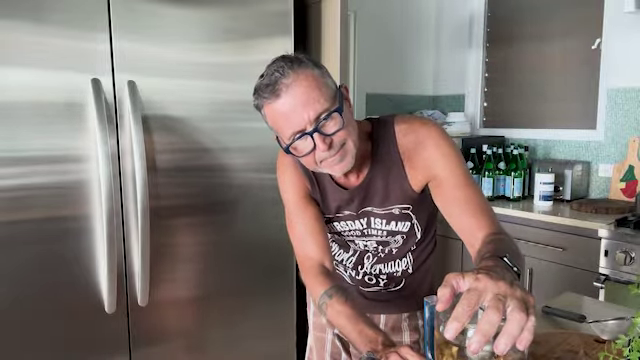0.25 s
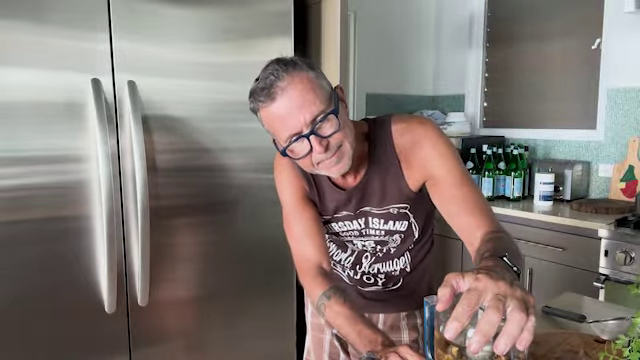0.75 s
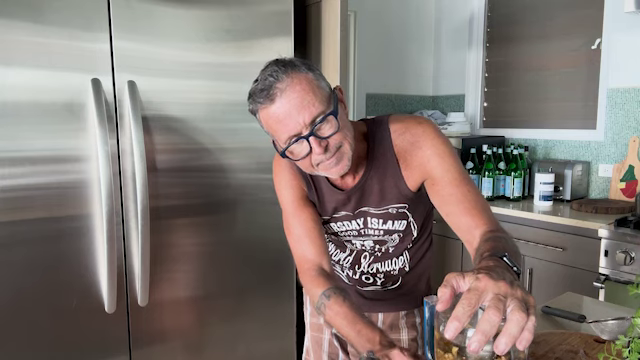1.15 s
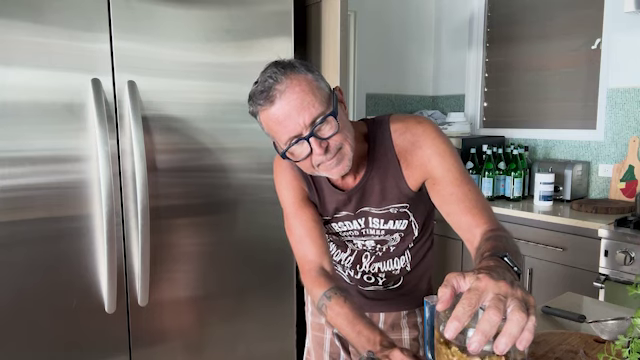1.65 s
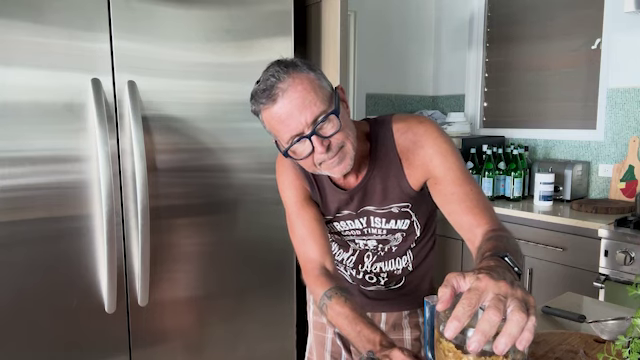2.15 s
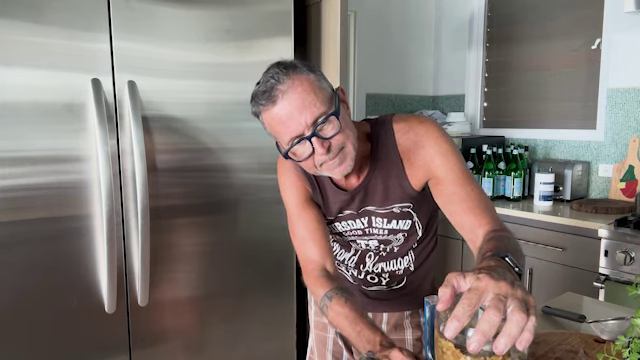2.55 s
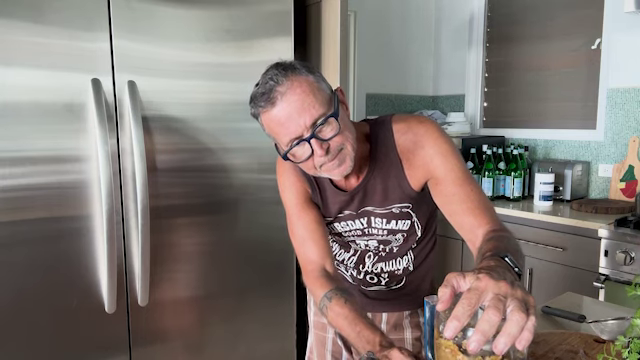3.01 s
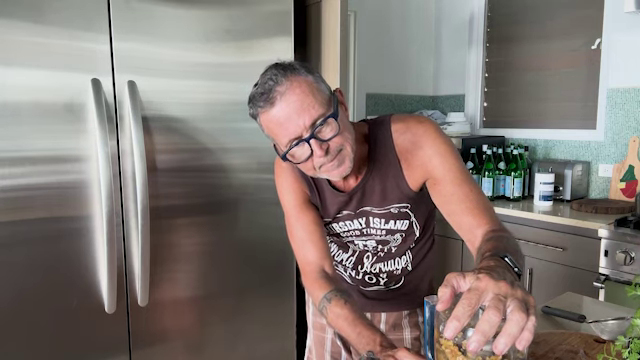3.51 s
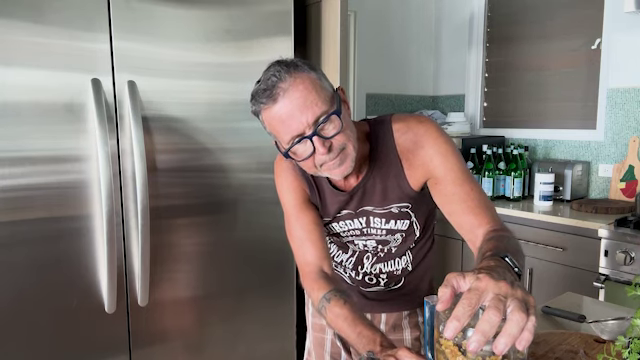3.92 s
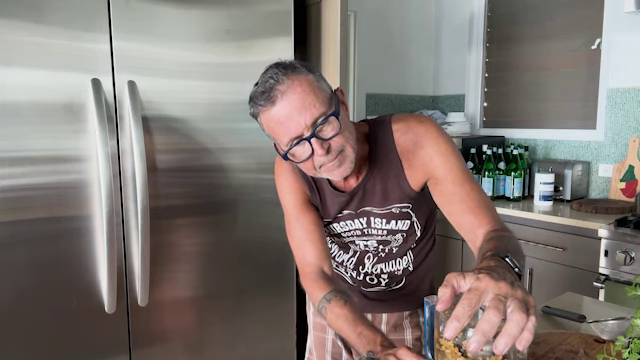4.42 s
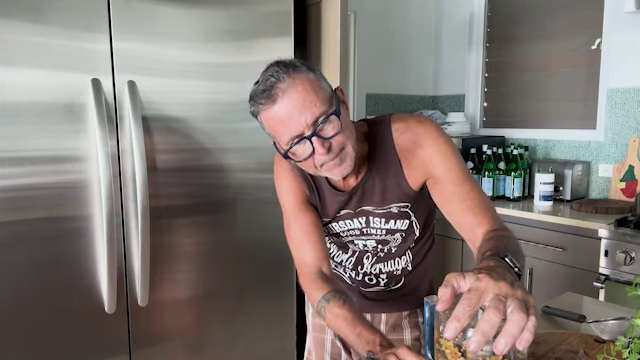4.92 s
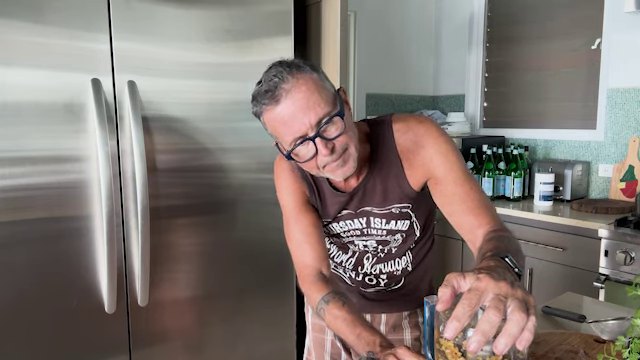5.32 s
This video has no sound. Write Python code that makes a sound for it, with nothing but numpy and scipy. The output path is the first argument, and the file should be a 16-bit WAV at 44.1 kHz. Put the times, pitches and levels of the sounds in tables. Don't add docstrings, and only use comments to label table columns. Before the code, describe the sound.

Quick jabs of an electric chopper's motor rise and sag with grinding and rattling, clicking switch and a faint fridge hum in an echoing kitchen.

```python
import sys
import numpy as np
from scipy import signal
from scipy.fft import rfft, irfft
from scipy.io import wavfile

SR = 44100
rng = np.random.default_rng(int(sys.argv[2]) if len(sys.argv) > 2 else 0)


def ratio_of_db(decibels):
    return 10 ** (np.asarray(decibels, float) / 20)


def unload_wav(signal):
    wavfile.write(
        sys.argv[1],
        SR,
        np.round(np.clip(np.atleast_2d(signal).T, -1, 1) * 32767).astype(np.int16),
    )


N = 245276
M = 2 ** 18
T = np.arange(N) / SR
FREQ = np.fft.rfftfreq(M, 1 / SR) + 1e-3

# start in seconds, time held in seconds, drag of the food as tooth rate
# in Hz, level in dB, bowl rattle in dB.
PRESSES = [(0.0, .06, 1099, -27.5, 1), (0.12, .18, 1400, -28, 2), (0.361, 0.17, 2200, -29, 3),
           (0.635, 0.11, 2300, -28, 3), (1.161, .22, 2500, -27.5, 1), (1.677, 0.12, 2300, -27, 2),
           (2.035, .122, 2202, -27, 2.5), (2.245, 0.089, 2399, -28.5, 2), (2.472, .09, 2597, -27, 1),
           (2.725, .07, 1898, -27.5, 3), (2.95, .075, 2203, -27, 2), (4.031, 0.14, 2000, -29, 2.5),
           (4.675, 0.13, 1966, -28, 2.5)]
START_HZ, FULL_HZ, REST_HZ, KICK_HZ = 1812.4, 2470, 99.6, 548.4
SPIN_UP_S, COAST_S = 0.054, 0.42
CONTACT_S, JERK_S = 0.006, 0.005


def motor():
    hz, driven = np.full(N, float(START_HZ)), np.zeros(N)
    now = START_HZ
    ends = [row[0] for row in PRESSES[1:]] + [N / SR]
    for (start, held, drag_hz, _, _), end in zip(PRESSES, ends):
        release = start + held

        def climb(t):
            return FULL_HZ + (max(now, KICK_HZ) - FULL_HZ) * np.exp(-(t - start) / SPIN_UP_S)

        def coast(t):
            falling = (climb(release) + drag_hz) * np.exp(-(t - release) / COAST_S)
            return np.maximum(falling - drag_hz, 0)

        later = T >= start
        t = T[later]
        hz[later] = np.where(t < release, climb(t), coast(t))
        driven[later] = t < release
        now = coast(end)
    return lag(hz, CONTACT_S), lag(driven, JERK_S)


# multiple of the tooth rate, level in dB.
TEETH = [(3, -10.5), (4, -16.5)]
# frequency in Hz, width in Hz, level in dB.
HOUSING = [(1070, 490, 5.5), (1518, 226, 9.5), (2056, 350, 0), (2860, 1100, -4), (3540, 570, 7),
           (4570, 170, 0.5), (5430, 660, 3.5)]
# frequency in Hz, width in Hz, level in dB.
BOWL = [(9400, 1300, -10.5), (9470, 380, -5), (10860, 3300, -10.5)]
HOUSING_DB = -9
FIRST_DB, SECOND_DB, MESH_HZ = (-2, 0.5), (-5.5, 2), (714, 790)
SECOND_HZ, SECOND_WIDTH_HZ = 1950, 380


def gears(hz, driven):
    mesh_db = -18 * np.exp(-(hz / between(MESH_HZ, driven)) ** 4)
    sings_db = 7 * np.exp(-((hz - SECOND_HZ) / SECOND_WIDTH_HZ) ** 2) - 5
    first_db = between(FIRST_DB, driven) + mesh_db
    second_db = between(SECOND_DB, driven) + mesh_db + sings_db
    hz = np.maximum(hz, REST_HZ)
    backlash = 0.64 + 0.5 * (hz / 2000) ** 1.5
    turn = 2 * np.pi * np.cumsum(hz * (1 + 0.011 * walk(120))) / SR
    tone = 0
    for multiple, db in [(1, first_db), (2, second_db)] + TEETH:
        phase = multiple * turn + backlash / np.sqrt(multiple) * walk(450)
        tone = tone + ratio_of_db(db + 5.05 * walk(110)) * np.cos(phase)
    shaft = (-turn / (2 * np.pi * 19) + 0.25 * walk(60)) % 1
    knock = 3.8 + shaft ** 3 * ratio_of_db(5.7 * walk(100))
    housing = level(tone + ratio_of_db(HOUSING_DB) * ring(tone, HOUSING), -2.5)
    bowl = level(ring(tone, BOWL), -14.5)
    return housing + bowl, knock


# frequency in Hz, density in dB per Hz.
WHIRR = [(120, -43.5), (200, -8.5), (365, -3.5), (479, 0.5), (607, -5.5), (1510, -7.5), (3070, 1),
         (3680, -4), (6960, -4.5), (9480, -7), (13900, -24.5), (14700, -4.5)]


def whirr(knock):
    chips = noise() * ratio_of_db(2.0 * walk(400)) * knock ** 0.39
    return level(colour(chips + ratio_of_db(-3.5) * ring(chips, HOUSING), WHIRR), 0.95)


def rattle(knock):
    return level(ring(noise() * knock * ratio_of_db(1.63 * walk(500)), BOWL), -1.27)


# frequency in Hz, width in Hz, level in dB.
COUNTER = [(147, 20, 4), (195, 50, -8), (310, 60, -10), (484, 14, -6)]
MAINS_HZ = 121.2


def drum():
    boom = level(ring(noise() * ratio_of_db(0.85 * walk(25)), COUNTER), -0.51)
    buzz = ratio_of_db(-15.0) * np.sin(2 * np.pi * MAINS_HZ * T + 0.5 * walk(4.6))
    return colour(boom + buzz, [(60, -4), (115, -0.5)])


BUZZ_HZ, BUZZ_S, BUZZ_DB = 486.2, (0.5, 0.92), -15


def jar():
    touching = 1.0 * (T > BUZZ_S[0]) * (T < BUZZ_S[1])
    return lag(touching, 0.04) * ratio_of_db(BUZZ_DB) * np.sin(2 * np.pi * BUZZ_HZ * T)


# frequency in Hz, level
# in dB.
TREBLE_END = [(14650, 0), (14950, -35)]
LOUDNESS_POWER, WHINE_POWER = 1.58, 0.95
TORQUE_DB = -3
SETTLE_DB, SETTLE_S = -10.5, 0.13
RATTLE_DB, DRUM_DB = (-10, 1.5), (-4.5, -9.5)


def machine():
    hz, driven = motor()
    speed = hz / FULL_HZ
    rows = np.array(PRESSES)
    press = np.maximum(np.searchsorted(rows[:, 0], T, side="right") - 1, 0)
    strength = ratio_of_db(lag(rows[press, 3], 0.025))
    growl = ratio_of_db(TORQUE_DB) * driven * (1 - np.minimum(speed, 1))
    loud = strength * (speed ** LOUDNESS_POWER + growl)
    loud = loud + ratio_of_db(SETTLE_DB) * lag(loud, SETTLE_S)
    rattle_db = between(RATTLE_DB, lag(speed, 0.011)) + lag(rows[press, 4], 0.03)
    drum_db = between(DRUM_DB, speed)
    whine, knock = gears(hz, driven)
    mix = jar() + whirr(knock) + ratio_of_db(rattle_db) * rattle(knock) + ratio_of_db(drum_db) * drum()
    whine = ratio_of_db(-0.5) * strength * speed ** WHINE_POWER * whine
    return colour(ratio_of_db(-2.5) * loud * mix + whine, TREBLE_END)


# start in seconds, peak level in dB, housing knock in dB against
# the crack, knock decay t60 in seconds.
TICKS = [(1.165, -15, -4, 0.05), (1.667, -32, -11, 0.05), (2.042, -23, -16, 0.032),
         (4.036, -18.5, -1.5, 0.052), (4.666, -28.5, -5.5, 0.084), (5.46, -34.5, 4, 0.074),
         (5.492, -36, -6.5, 0.12)]
# frequency in Hz, width in Hz, level in dB.
SWITCH = [(1190, 300, 1.5), (2300, 1100, -6.5), (4180, 1150, -23)]


def ticks():
    crack, knock = np.zeros((2, N))
    t = T[:4096]
    for start, db, knock_db, t60 in TICKS:
        i = int(start * SR)
        grit = rng.standard_normal(len(t))
        crack[i:i + len(t)] += ratio_of_db(db) * (grit * np.exp(-t / 0.0014))[:N - i]
        knock[i:i + len(t)] += ratio_of_db(db + knock_db) * (grit * 1000.0 ** (-t / t60))[:N - i]
    return colour(crack, [(3000, -6.0), (9000, -17.5), (15500, -10)]) + ring(knock, SWITCH)


# frequency in Hz, decay t60 in seconds, level in dB against the direct sound.
ROOM = [(200, 0.99, -8), (742, 0.73, -1), (3500, 0.71, -0.5), (9670, 0.65, -12), (14000, 0.24, -12.5)]


def kitchen(x):
    t = T[:SR]
    band_hz = np.array(ROOM)[:, 0]
    alike = 1 / (1 + (FREQ / 330) ** 4)
    echo = 0
    for k, (_, t60, db) in enumerate(ROOM):
        share = np.interp(np.log(FREQ), np.log(band_hz), np.arange(len(ROOM)) == k)
        tail = rng.standard_normal((2, SR)) * 1000.0 ** (-t / t60) * (t > 0.004)
        tail = tail * ratio_of_db(db) / np.sqrt(np.sum(tail ** 2, axis=1, keepdims=True))
        tail = rfft(tail, M)
        echo = echo + share * (alike * tail[0] + np.sqrt(1 - alike ** 2) * tail)
    return signal.fftconvolve(x[None], irfft(echo, M)[:, :SR], axes=1)[:, :N]


# frequency in Hz, rms level in dB.
FRIDGE = [(59.2, -66), (91.5, -67), (118.4, -60), (317.6, -77), (586.8, -68.5), (640.6, -71)]
# frequency in Hz, density in dB per Hz.
AIR = [(15, -51), (25, -38), (107, -1.5), (525, -15), (584, -16), (703, -20.5), (1470, -29), (2030, -25),
       (8690, -42), (11600, -49), (14000, -68)]
AIR_DB = -58.5


def fridge():
    hum = 0
    for hz, db in FRIDGE:
        line = np.sin(2 * np.pi * hz * T + 0.85 * walk(4.2))
        hum = hum + np.sqrt(2) * ratio_of_db(db + 1.2 * walk(23.0)) * line
    mid = colour(noise(), AIR)
    side = colour(colour(noise(), AIR), [(100, -10.5), (600, 1.0)])
    return hum + level(mid + side * np.array([[1], [-1]]), AIR_DB)


def noise():
    return rng.standard_normal(N)


def walk(rate):
    steps = rng.standard_normal(N // 8)
    return 1.2 * np.interp(T * rate, np.arange(len(steps)), steps)


def lag(x, seconds):
    keep = np.exp(-1 / (seconds * SR))
    return signal.lfilter([1 - keep], [1, -keep], x, zi=[keep * x[0]])[0]


def between(ends, share):
    return ends[0] + (ends[1] - ends[0]) * share


def level(x, db):
    return x * ratio_of_db(db) / np.sqrt(np.mean(x ** 2))


def shape(x, gain):
    return irfft(rfft(x, M) * gain, M)[..., :N]


def colour(x, points):
    hz, db = np.transpose(points)
    return shape(x, ratio_of_db(np.interp(np.log(FREQ), np.log(hz), db)))


def ring(x, modes):
    response = 0
    for hz, width, db in modes:
        response = response + ratio_of_db(db) / (1 + 1j * (FREQ / hz - hz / FREQ) * hz / width)
    return shape(x, response)


# frequency in Hz, lead of the left in radians, left minus right in dB.
PORTS = [(170, -0.2, -1.2), (380, -0.6, -1.6), (700, -1.5, -4), (2650, -2, -0.2), (4260, -4, -3.3),
         (7000, -5.5, 0.9), (10600, -6.5, -0.5), (15000, -3.5, 1)]


def scene():
    near = machine() + ticks()
    hz, lead, left_db = np.transpose(PORTS)
    direct = np.array([shape(near, np.exp(1j * np.interp(FREQ, hz, lead))), near])
    left = ratio_of_db(np.interp(FREQ, hz, left_db) / 2)
    return shape(direct + kitchen(near) + fridge(), np.array([left, 1 / left]))


def top_cut(x):
    return signal.sosfilt(signal.butter(12, 15740, fs=SR, output="sos"), x)


def record(dry):
    return top_cut(dry)


dry = scene()
out = record(dry)
unload_wav(out)
```